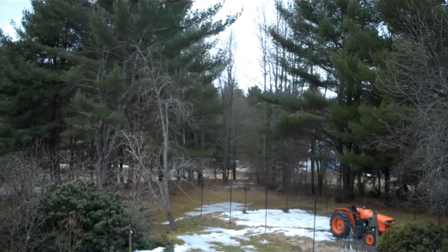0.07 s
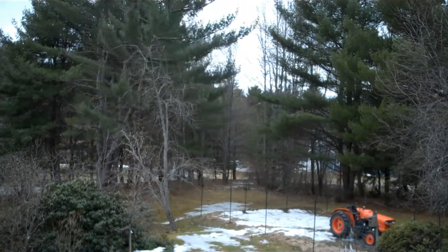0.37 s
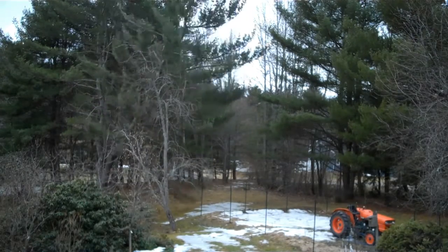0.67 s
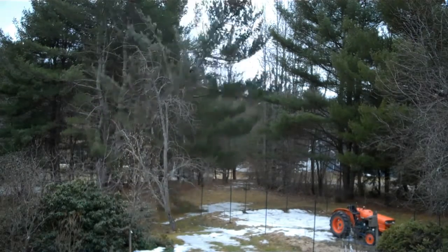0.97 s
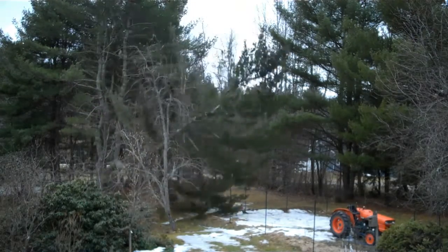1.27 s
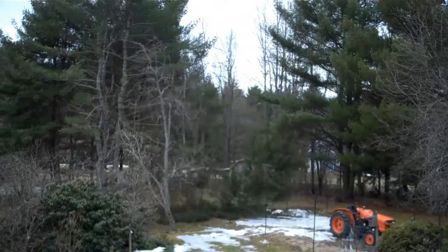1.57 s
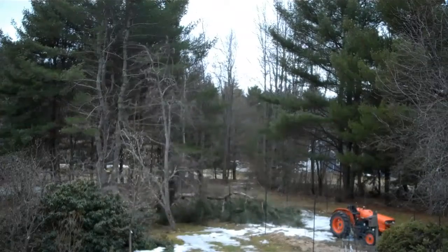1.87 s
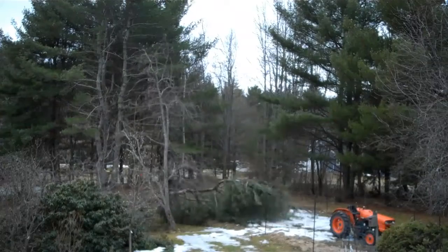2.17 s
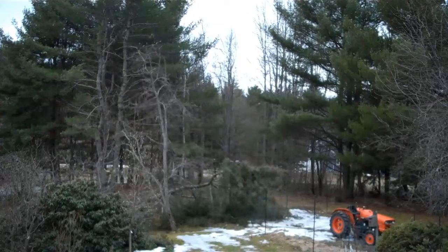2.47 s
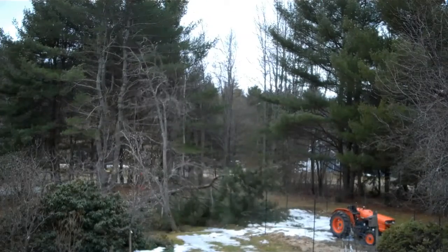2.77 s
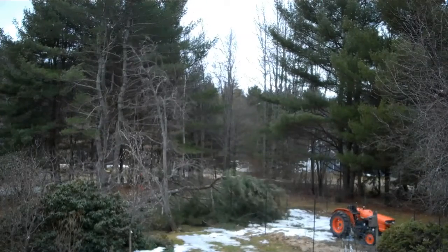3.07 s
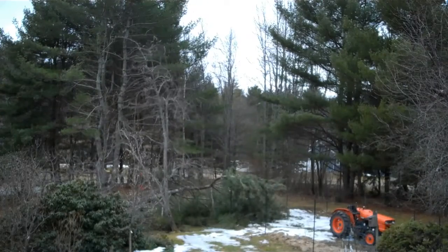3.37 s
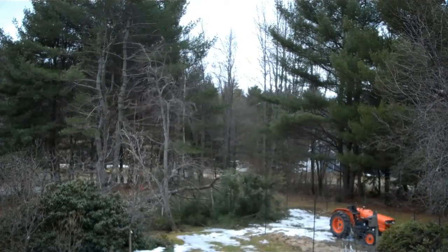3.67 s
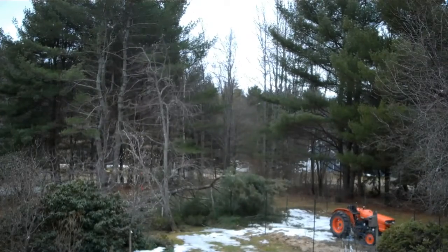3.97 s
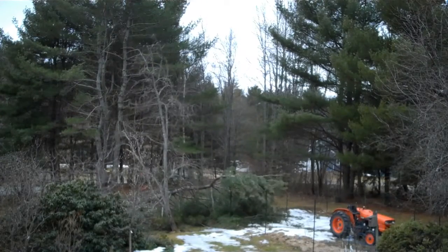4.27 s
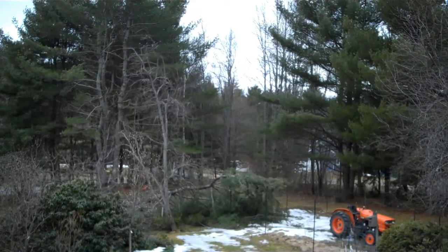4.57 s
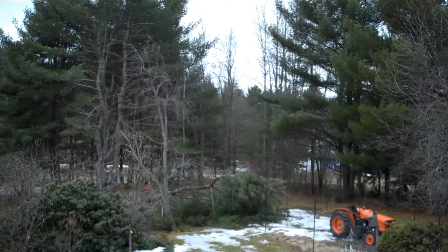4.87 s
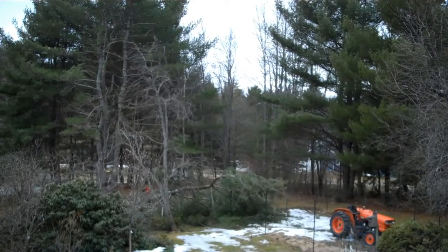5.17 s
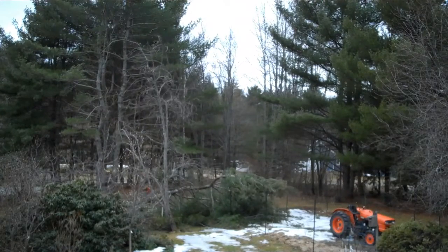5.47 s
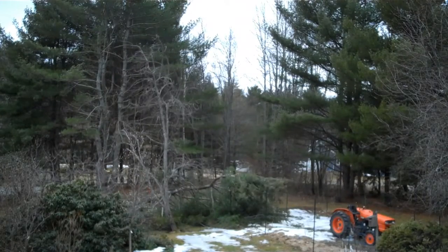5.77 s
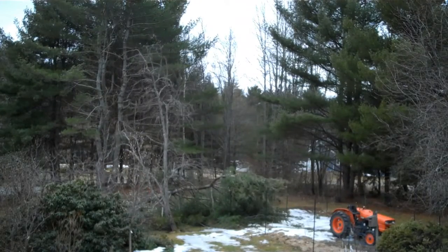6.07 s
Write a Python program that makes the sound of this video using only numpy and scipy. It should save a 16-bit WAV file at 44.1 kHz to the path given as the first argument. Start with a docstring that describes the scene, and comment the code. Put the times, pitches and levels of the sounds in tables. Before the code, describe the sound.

Heard from across a garden beside a wood, tree fibres crack and rip as a heavy pine bough gives way. Needles swish and twigs crackle as it falls, swelling into a crash of breaking wood and dull thuds, the loudest cracks overloading the microphone. The rustle dies down to scattered small ticks. A short outdoor echo follows the cracks, and a distant road and a very faint engine stay underneath.

```python
"""A big pine limb tears loose some thirty metres off: wood fibres crack, twigs crackle, needles swish.
It drops through the branches; from 1.5 s boughs thump a lawn at the edge of a wood. From 2.5 s it slips,
ticks and settles. Throughout, trunks scatter the sound, a house wall close behind the listener echoes it,
and a far road and a faint engine hum lie behind. Two microphone ports ring in the treble; the loudest
cracks overload the input."""
import sys
import numpy as np
from scipy import signal
from scipy.fft import rfft, irfft, next_fast_len
from scipy.io import wavfile
from scipy.ndimage import uniform_filter1d

SR = 44100
rng = np.random.default_rng(int(sys.argv[2]) if len(sys.argv) > 2 else 0)


def dump_mix(stems):
    """Bounce the given channels to the path in sys.argv[1] as a 16-bit WAV at rate SR."""
    frames = np.atleast_2d(stems).T  # one column per channel
    limited = np.clip(frames, -1, 1)  # hard clip at full scale
    pcm = np.round(limited * 32767).astype(np.int16)
    wavfile.write(sys.argv[1], SR, pcm)


N = 278271
TIME_S = np.arange(N) / SR

# hollow ring of the main limb: (frequency [Hz], width [Hz], gain [dB])
HOLLOW_MODES = [(312.4, 94, -7), (569, 42, 2.5), (680, 49, -1), (861, 32, 4), (1092, 55, 1.5),
                (1600, 160, 3), (2225, 99, -4), (2870, 150, 0)]


def cracks(air_db=-16.5, ring_q=2.4, impulse_db=3, ragged_db=4, lead_db=-22, lead_share=0.86,
           splinters_per_s=420, splinter_db=-18, splinter_stretch=7, rolloff_db_per_oct=5.5, load_db=4):
    """A few fibres give way, the wood fails sharply, and a ragged, dying tear rings the branch."""
    # wood breaking: (time [s], level [dB], branch ring [Hz], tearing time [ms], ring gain [dB])
    breaks = [(0.0563, -27, 2320, 2.5, -1.5), (0.0635, -30, 2200, 1.2, -8), (0.0733, -34, 4500, 1, -3),
              (0.0853, -24.5, 3800, 4.9, -7), (0.0964, -29, 3100, 0.72, -9), (0.1012, -25.5, 3100, 3.7, -2),
              (0.109, -22.5, 1080, 2.2, -14), (0.1191, -24.5, 3660, 32, -6),
              (0.1985, -24.5, 2280, 2.2, -17), (0.211, -29.5, 7350, 0.43, -1),
              (0.2168, -30, 6200, 0.68, -8), (0.2245, -22.5, 2460, 4, -10), (0.2295, -26.5, 1270, 1.1, 0.5),
              (0.2488, -21.5, 4150, 1.7, -4.5), (0.3886, -33, 4600, 5.5, 4.5),
              (0.4023, -28.5, 6860, 1.2, -23), (0.4394, -26, 5930, 1.7, -18),
              (0.4499, -23, 1650, 1.7, -2.5), (0.4803, -33, 5000, 0.5, -12), (0.4875, -33, 4200, 0.6, -14),
              (0.5037, -30.5, 1790, 1.8, -8), (0.5098, -34, 5800, 0.3, -5), (0.5567, -36, 2950, 0.6, -1),
              (0.5612, -25.5, 7000, 0.5, -1.5), (0.6412, -26.5, 2490, 1.5, 4), (0.646, -19, 2400, 4.5, -4),
              (0.6608, -30, 3020, 4, 1), (0.6695, -30, 3600, 0.54, -6), (0.6776, -27.5, 2300, 1.6, 0.5),
              (0.7106, -25, 2800, 29, -2.5), (0.725, -31, 2520, 3.5, -11), (0.7526, -31, 2920, 0.4, 8),
              (0.773, -37, 2550, 2.2, 6.5), (0.8313, -35.5, 5450, 0.65, -15), (0.88, -34.5, 4940, 1.4, -23),
              (1.0159, -22.5, 4700, 0.4, -2), (1.2, -36.5, 2220, 2, 5.5), (1.3162, -24, 4400, 0.77, -16),
              (1.3211, -28, 4370, 1.2, 7.5), (1.3232, -25.5, 4470, 0.53, 0), (1.373, -27.5, 6950, 0.7, -6),
              (1.4515, -27, 4700, 1.3, -11), (1.456, -28, 6500, 1.4, -13), (1.469, -28, 5030, 7, -18),
              (1.5028, -6, 2370, 2.25, -8), (1.518, -25, 2200, 6.7, -8), (1.568, -21.5, 2660, 9.8, -11),
              (1.6207, -16, 3160, 1.7, -24), (1.69, -19, 5600, 15, -20), (1.7092, -21.5, 6300, 0.32, -2),
              (1.714, -17, 6070, 0.52, -15), (1.726, -8, 1900, 3.3, -13), (1.7303, -20.5, 6200, 1.2, 3),
              (1.735, -14, 2400, 9, -5), (1.741, -22, 1300, 5, -6.5), (1.7777, -9, 2000, 1.5, -8),
              (1.781, -21.5, 1600, 6, -8.5), (1.7932, -24, 5900, 0.92, 0.5), (1.8032, -12, 3600, 3, -13),
              (1.809, -23.5, 1900, 4, -7.5), (1.8631, -16, 2450, 2, -18), (1.9052, -17.5, 2530, 5, -6),
              (1.936, -16, 3960, 0.41, -12.5), (1.938, -13, 3300, 1.3, -5.5), (1.9746, -18, 2450, 0.81, -6),
              (2.055, -19.5, 3040, 1.2, -3), (2.0622, -21, 4000, .6, -13), (2.08, -25, 2900, 2, -1),
              (2.086, -24, 3650, 0.7, -13), (2.1017, -15.5, 2730, 1.8, -14), (2.1274, -19, 3050, 3.3, -5.5),
              (2.1955, -32, 2400, 1.9, -1), (2.413, -22, 1800, 2.2, -14), (2.5585, -17, 2100, 2.2, -26),
              (2.672, -37.5, 4730, 2.1, 8.5), (2.7503, -37, 6560, 0.46, -1), (2.7895, -27.5, 7600, 0.64, 6),
              (2.7937, -28, 2750, 3, -10), (2.8716, -39.5, 7050, 0.62, 0), (2.9115, -42, 4500, 3.3, 1),
              (2.946, -44, 6000, 0.6, -3), (3.0238, -36, 6000, 0.6, -8), (3.1026, -42, 6000, 0.6, -8),
              (3.185, -36.5, 5160, 3.5, -10), (3.364, -42, 5600, 0.55, -3), (3.397, -40.5, 2570, 7, -3),
              (3.4398, -38, 5800, 6.9, -9), (3.47, -38, 5840, 1.5, -4), (3.5454, -42, 6000, 0.5, -5),
              (3.59, -47.5, 4470, 2.4, 7.5), (3.7058, -36.5, 4100, 4.2, -7), (3.8682, -48, 4000, 2.7, -1),
              (4.3023, -42.5, 6700, 9.1, 0.5), (4.3505, -46.5, 2210, 14, -2),
              (4.524, -54.5, 6250, 5.7, 8.5), (4.456, -55, 3900, 0.93, -1.5), (4.887, -47, 6000, 5, -14),
              (4.892, -44.5, 5570, 7.2, -13), (5.263, -53, 6160, 9.8, -1.5), (5.2866, -47, 4500, 10, -16.5),
              (5.4568, -64.5, 6240, 1.4, 7.5), (5.573, -60, 7660, 3.5, 0), (5.749, -64.5, 6490, 1, -1),
              (6.0444, -43, 6800, 0.75, -4), (6.233, -57, 4470, 1.9, -6)]
    # knock, crack and snap bands: (low edge [Hz], high edge [Hz], trim [dB])
    bands = [(560, 1030, -11), (1280, 2790, -6), (4070, 8030, -6)]
    lows_hz, highs_hz, trims_db = np.transpose(bands)
    onset = 2048
    out, ms = np.zeros(N + SR), np.arange(-onset, onset) * 1000 / SR
    for s, db, hz, tear_ms, ring_db in breaks:
        noise, roughness = rng.standard_normal((2, len(ms)))
        lead_in = undb(lead_db) * np.exp(-abs(ms) / (lead_share * tear_ms))
        strain = np.where(ms < 0, lead_in, np.exp(-abs(ms) / tear_ms))
        splinter_fade = np.exp(-abs(ms) / (splinter_stretch * tear_ms))
        splinters = (rng.random(len(ms)) < splinters_per_s / SR) * splinter_fade
        tear = unit(noise * undb(ragged_db * roughness)) * strain
        tear += undb(splinter_db) * np.linalg.norm(tear) * splinters * np.sign(noise)
        tear[onset] += undb(impulse_db)
        # thick branches crack low, thin ones snap high; those pressed on the lawn knock more
        octaves = abs(np.log2(hz / np.sqrt(lows_hz * highs_hz)))
        levels_db = db + trims_db - rolloff_db_per_oct * (octaves - octaves.min())
        knock, crack, snap = (burst(band(tear, lo, hi), band_db)
                              for lo, hi, band_db in zip(lows_hz, highs_hz, levels_db))
        air = burst(band(tear, highs_hz[-1], 16000), levels_db[-1] + air_db)
        # the freed end shudders at its own pitch
        shudder = burst(ring(ring(roughness * strain, hz, hz / ring_q), hz, hz / ring_q), db + ring_db)
        start = int(s * SR) - onset
        out[start:start + len(ms)] += knock * undb(load_db * grounded(s)) - crack + snap - air + shudder
    return out[:N]


def thumps(impulse_db=15, low_hz=215, top_hz=2400, hollow_db=-2):
    """A bough hits the turf, scuffs and rings in its bending modes; the main limb rings on."""
    # boughs on the lawn: (time [s], level [dB], pitch [Hz], contact time [ms], lowest-mode gain [dB])
    strikes = [(1.506, -30.5, 620, 7.5, 1.5), (1.525, -28.5, 372, 9.1, -6), (1.59, -30.5, 316, 2, -8),
               (1.6215, -28, 603, 2.5, 3), (1.646, -38, 320, 1.6, -4.5), (1.704, -29, 370, 2.1, -7.5),
               (1.7336, -21.5, 646, 5.3, 9.5), (1.7778, -15, 920, 3.1, 6), (1.7815, -19.5, 640, 1.9, 8),
               (1.8078, -18.5, 644, 1.6, 8), (1.939, -19, 674, 4.1, -9.5), (1.978, -24, 630, 3.8, 0),
               (2.054, -24.5, 620, 4.1, 2), (2.1278, -22.5, 656, 9.5, -25), (2.1952, -22.5, 600, 0.79, 9),
               (2.34, -32.5, 640, 4, 11), (2.4128, -16, 613, 0.9, 0.5), (2.43, -37, 715, 4, -9),
               (2.5585, -16, 1010, 12, -13.5), (2.563, -23.5, 630, 8.8, -6)]
    # bough bending modes: (frequency / pitch [ratio], width / frequency [ratio], gain [dB])
    bending_modes = [(.49, .3, 7), (1.001, 0.36, 11.5), (2.1, 0.6, -15.5)]
    out, ms = np.zeros(N + SR), np.arange(8192) * 1000 / SR
    for s, db, hz, contact_ms, heft_db in strikes:
        push = scuff(ms, contact_ms, impulse_db)
        lowest, *upper = (undb(mode_db) * ring(push, hz * ratio, hz * ratio * width)
                          for ratio, width, mode_db in bending_modes)
        blow = undb(heft_db) * lowest + sum(upper)
        hollow = sum(undb(hollow_db + mode_db) * ring(blow, mode_hz, width_hz)
                     for mode_hz, width_hz, mode_db in HOLLOW_MODES)
        start = int(s * SR)
        out[start:start + len(ms)] += burst(band(blow + hollow, low_hz, top_hz, order=4), db)
    return out[:N]


def twigs(level_db, per_s=1000, spread_db=1.5, flurry_db=2.26):
    """Twigs of many sizes snap in flurries: dry clicks and brief rings."""
    pitched = sum(ring(clicks(per_s / 8, spread_db), hz, hz / 3) for hz in np.geomspace(1000, 3400, 8))
    crackle = unit(pitched) + undb(7) * unit(clicks(per_s, spread_db))
    return unit(band(crackle, 750, 3900)) * undb(level_db + flurry_db * walk(29.91))


def needles(level_db, per_s=2400, spread_db=4.5, flurry_db=-1.33):
    """Tufts of needles brush past each other: a dense bright patter."""
    patter = clicks(per_s, spread_db)
    swish = band(patter, 4200, 8850) + undb(-12) * band(patter, 1500, 14000)
    return unit(swish) * undb(level_db + flurry_db * walk(24.71))


def fibres(level_db, per_s=260, spread_db=3, snap_q=1.3, tearing_db=7, free_s=0.93):
    """Single fibres and dry twig tips snap, boosted while the limb still hangs from the trunk."""
    snaps = sum(ring(clicks(per_s / 6, spread_db), hz, hz / snap_q) / np.sqrt(hz)
                for hz in np.geomspace(1500, 6500, 6))
    hanging = np.clip((free_s - TIME_S) * 10, 0, 1)
    return unit(band(snaps, 900, 8500)) * undb(level_db + tearing_db * hanging)


def boughs(level_db, per_s=700, spread_db=2.5, airborne_db=-3, ease_db=3, ease_from_s=2, ease_time_s=0.55):
    """Thick boughs knock together; their two lowest modes grow with the load and weaken as it eases."""
    # broad bough resonances: (frequency [Hz], width [Hz], gain [dB])
    modes = [(238, 85, -0.5), (317, 77, 3.5), (600, 180, 1), (1085, 550, -9)]
    knocks = clicks(per_s, spread_db)
    deep, upper = (band(body(knocks, part), 205, 1700, order=3) for part in (modes[:2], modes[2:]))
    eased = np.clip((TIME_S - ease_from_s) / ease_time_s, 0, 1)
    deep_db = airborne_db * (1 - grounded(TIME_S)) - ease_db * eased
    return (deep * undb(deep_db) + upper) / np.std(deep + upper) * undb(level_db)


def ground(floor_db, per_s=240, spread_db=2.5, rise_db_per_s=96, fall_db_per_s=73):
    """Dull thuds: the limb's weight jolts the trunk, then the turf."""
    # jolt peaks: (time [s], level [dB])
    jolts = [(0.109, -57.5), (0.55, -66), (1.38, -59), (1.781, -41), (2.06, -38), (2.15, -49), (2.6, -49)]
    # ground resonances: (frequency [Hz], width [Hz], gain [dB])
    modes = [(42, 38, -21.5), (79, 9, -8), (135, 31, -8)]
    jolt_db = np.max([db - np.maximum(rise_db_per_s * (s - TIME_S), fall_db_per_s * (TIME_S - s))
                      for s, db in jolts], axis=0)
    thuds = band(body(clicks(per_s, spread_db), modes), 22.07, 240)
    return unit(thuds) * undb(np.maximum(jolt_db, floor_db))


def settling(level_db, from_s=2.5, per_s=130, spread_db=2.5, slip_ms=2.6, impulse_db=12, dry_db=-17):
    """The fallen limb slips on its bent branches; clear ticks and many small ones ring its hollow modes."""
    # clear ticks: (time [s], level [dB])
    ticks = [(2.872, -38), (2.913, -37), (2.96, -35.5), (3.005, -46), (3.073, -35), (3.095, -39.5),
             (3.163, -46), (3.258, -44.5), (3.365, -47), (3.399, -41), (3.517, -42), (3.589, -44),
             (3.706, -40), (3.75, -49), (3.8, -48), (3.868, -42.5)]

    def wood(push):
        return band(body(push, HOLLOW_MODES) + undb(dry_db) * push, 260, 5500)

    slipping = np.clip((TIME_S - from_s) * 10, 0, 1)
    small_ticks = unit(wood(clicks(per_s, spread_db))) * undb(level_db) * slipping
    out, ms = np.pad(small_ticks, (0, SR)), np.arange(4096) * 1000 / SR
    for s, db in ticks:
        start = int(s * SR)
        out[start:start + len(ms)] += burst(wood(scuff(ms, slip_ms, impulse_db)), db)
    return out[:N]


def forest(x, wet_db, t60_low_s, t60_high_s, near_db, near_s):
    """Direct sound, a long wash from the trunks and quick scatter from the nearest branches."""
    t = TIME_S[:int(0.7 * SR)]
    scatter = diffuse(rng.standard_normal((2, len(t))), alike_hz=1590)
    low = lowpass(scatter, 2500)
    wash = low * 1000. ** (-t / t60_low_s) + (scatter - low) * 1000. ** (-t / t60_high_s)
    out = x + undb(wet_db) * signal.oaconvolve(x[None], unit(wash), axes=1)[:, :N] / np.sqrt(len(t))
    # each moment comes from another part of the crown, with its own near echoes
    size = 1024
    starts = np.arange(0, N - 2 * size, size)
    for start, pick in zip(starts, rng.integers(0, len(t) - size, len(starts))):
        near = unit(scatter[:, pick:pick + size] * np.exp(-t[:size] / near_s)) / np.sqrt(size)
        echoes = irfft(rfft(near, 2 * size) * rfft(x[start:start + size], 2 * size))
        out[:, start:start + 2 * size] += undb(near_db) * echoes
    return out


def house_wall(x, delay_s=0.00288, gain=0.3, top_hz=2000):
    """One short, dull echo off the wall: lifts multiples of about 350 Hz."""
    delayed = np.pad(x, ((0, 0), (int(delay_s * SR), 0)))[:, :N]
    return x + gain * lowpass(delayed, top_hz)


def road(flutter_db=0.5):
    """Far tyre noise that wavers in the air."""
    # tyre noise spectrum: (frequency [Hz], relative density [dB])
    spectrum = [(25, -17.5), (60, -14), (100, -11), (130, 0.5), (185, -8), (250, -5), (400, -0.5),
                (520, -2), (800, 1.5), (1100, -3.5), (1600, -11), (2500, -25), (4000, -34), (8000, -35)]
    # nearly steady road level: (time [s], level [dB])
    levels = [(0, -46), (4.6, -51.5), (5.3, -51.5), (5.9, -49.5), (6.3, -51.5)]
    hz, db = np.transpose(spectrum)
    size = next_fast_len(N + N % 2, real=True)
    bins_hz = np.maximum(np.arange(size // 2 + 1) * SR / size, 1)
    noise = diffuse(rng.standard_normal((2, size)), alike_hz=2100)
    tyres = irfft(rfft(noise) * undb(np.interp(np.log(bins_hz), np.log(hz), db)), size)[:, :N]
    return unit(tyres) * undb(curves(levels)[0] + flutter_db * walk(8))


def engine(base_hz=67.3, level_db=-66.5, third_db=-6.5, waver=0.012, fading_db=2.5,
           rev_s=2, rev_time_s=0.17, rev_hz=5.4, rev_db=4, bright_db=3):
    """Harmonics 2 and 3 of a far engine fade in and out; it revs once: higher, louder, brighter."""
    throttle = (1 + np.tanh((TIME_S - rev_s) / rev_time_s)) / 2
    hz = base_hz + rev_hz * throttle
    phase = 2 * np.pi * np.cumsum(hz * (1 + waver * walk(7.1))) / SR
    second = np.sin(2 * phase) * undb(fading_db * walk(11))
    third = np.sin(3 * phase) * undb(third_db + bright_db * throttle + fading_db * walk(9))
    return np.sqrt(2) * undb(level_db + rev_db * throttle) * (second + third)


def breeze(level_db=-72, top_hz=110):
    """Faint rumble of moving air, different at each microphone."""
    return unit(band(rng.standard_normal((2, N)), 15, top_hz, order=1)) * undb(level_db)


def port(x, peak_hz, peak_width_hz, dip_hz, dip_width_hz):
    """Air in a microphone port resonates in the treble and cancels a band just above."""
    def pair(hz, width_hz):
        root = np.exp((-np.pi * width_hz + 2j * np.pi * hz) / SR)
        taps = np.poly([root, root.conjugate()]).real
        return taps / taps.sum()
    return signal.lfilter(pair(dip_hz, dip_width_hz), pair(peak_hz, peak_width_hz), x)


def grounded(s, touch_s=0.62, down_s=2.3):
    """Share of the limb's weight on the lawn, 0-1."""
    return np.clip((s - touch_s) / (down_s - touch_s), 0, 1)


def scuff(ms, decay_ms, impulse_db):
    """Contact force: an impulse, then dying friction noise."""
    push = rng.standard_normal(len(ms)) * np.exp(-ms / decay_ms)
    push[0] += undb(impulse_db)
    return push


def clicks(per_s, spread_db, max_per_s=6000):
    """Random impulses, many small and a few large."""
    when, chance, draw, sign = rng.random((max_per_s * N // SR, 4)).T
    size = undb(spread_db * np.minimum(-np.log(1 - draw), 5)) * (chance < per_s / max_per_s)
    return np.bincount((when * N).astype(int), size * np.sign(sign - 0.5), N)


def walk(rate_hz):
    """Smooth random wander, rms 1."""
    hold = int(SR / rate_hz)
    steps = np.repeat(rng.standard_normal(N // hold + 1), hold)
    return unit(uniform_filter1d(uniform_filter1d(steps, hold), hold)[:N])


def diffuse(pair, alike_hz, max_coherence=0.98):
    """Two unrelated signals as sound from all around: close microphones agree only in the bass."""
    count = pair.shape[1]
    coherence = max_coherence / (1 + (np.arange(count // 2 + 1) * SR / count / alike_hz) ** 2)
    mid, side = rfft(pair) * np.sqrt([1 + coherence, 1 - coherence])
    return irfft(np.array([mid + side, mid - side]), count) / np.sqrt(2)


def ring(x, hz, width_hz):
    """One resonance, gain 1 at its centre."""
    return signal.lfilter(*signal.iirpeak(hz, hz / width_hz, fs=SR), x)


def body(x, modes):
    """Parallel resonances of alternating sign."""
    return sum((-1) ** k * undb(db) * ring(x, hz, width_hz) for k, (hz, width_hz, db) in enumerate(modes))


def band(x, lo_hz, hi_hz, order=2):
    """Causal band-pass."""
    return signal.sosfilt(signal.butter(order, [lo_hz, hi_hz], "bandpass", fs=SR, output="sos"), x)


def lowpass(x, hz):
    """First-order low-pass."""
    return signal.sosfilt(signal.butter(1, hz, fs=SR, output="sos"), x)


def burst(x, db):
    """Scale a short sound to the energy of 10 ms at this level."""
    return undb(db) * x / np.sqrt(np.sum(x ** 2) * 100 / SR)


def curves(table):
    """Columns of a (time [s], ...) table at every sample."""
    s, *columns = np.transpose(table)
    return [np.interp(TIME_S, s, column) for column in columns]


def undb(db):
    """Decibels to gain."""
    return 10 ** (np.asarray(db) / 20)


def unit(x):
    """Scale to rms 1."""
    return x / np.sqrt(np.mean(x ** 2))


def scene(rest_s=4.65, settle_db_per_s=26, weight_db=7.5):
    """The fall, heard through the trees, over the far background."""
    # moving crown: (time [s], twig base level [dB], needle base level [dB])
    crown_levels = [(0.0, -35, -33.5), (0.6, -41.5, -35.5), (0.83, -41, -42.5), (1.07, -39, -42.5),
                    (1.34, -36.5, -33), (1.53, -37.5, -28), (1.67, -29.5, -26.5), (1.93, -29.5, -33.5),
                    (2.14, -31, -36.5), (2.67, -35, -30.5), (2.86, -41.5, -37), (3.16, -46, -42),
                    (3.48, -48, -43), (3.76, -48, -46), (4.01, -51.5, -50), (4.41, -59.5, -54),
                    (4.94, -66.5, -60.5), (6.31, -66.5, -67)]
    twig_db, needle_db = curves(crown_levels)
    # heavy wood moves with the twigs but rests sooner
    heavy_db = twig_db - settle_db_per_s * np.maximum(TIME_S - rest_s, 0)
    crown = twigs(twig_db - 3.5) + needles(needle_db - 9)
    wood = boughs(heavy_db - 15.5 + weight_db * grounded(TIME_S)) + ground(heavy_db - 31)
    rustle = forest(crown + wood, wet_db=-3, t60_low_s=0.78, t60_high_s=0.2, near_db=2, near_s=0.011)
    breaks = forest(cracks() + fibres(heavy_db - 10),
                    wet_db=-9, t60_low_s=1, t60_high_s=0.67, near_db=-5.5, near_s=0.0098)
    blows = forest(thumps() + settling(heavy_db - 6),
                   wet_db=-6, t60_low_s=0.8, t60_high_s=0.73, near_db=-6.5, near_s=0.014)
    return house_wall(rustle + breaks + blows + engine()) + road() + breeze()


def record(dry, hiss_db=-63, top_hz=14400):
    """Each port rings at its own pitch, the preamp hisses, the loudest peaks overload, the top is cut."""
    # microphone ports, left then right: (peak [Hz], peak width [Hz], dip [Hz], dip width [Hz])
    ports = [(6934, 1020, 7350, 5300), (6025, 940, 9000, 3500)]
    heard = np.array([port(x, *shape) for x, shape in zip(dry, ports)])
    heard = np.clip(heard + undb(hiss_db) * rng.standard_normal((2, N)), -1, 1)
    return signal.sosfilt(signal.ellip(8, 0.2, 60, top_hz, fs=SR, output="sos"), heard)


dry = scene()
out = record(dry)
dump_mix(out)
```